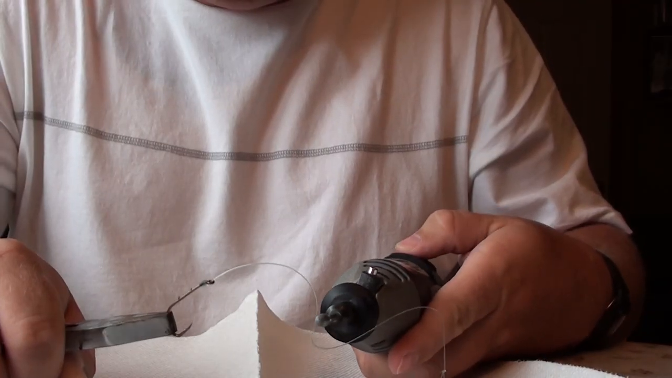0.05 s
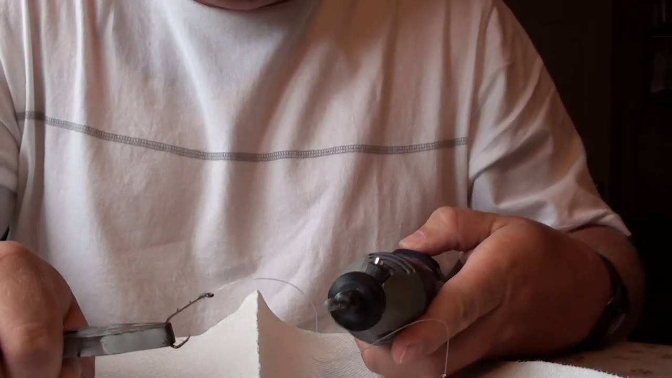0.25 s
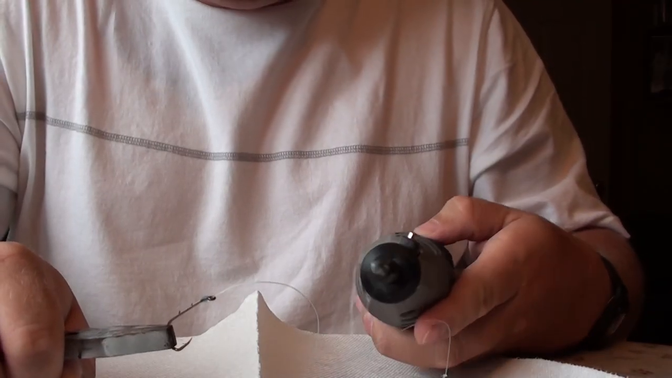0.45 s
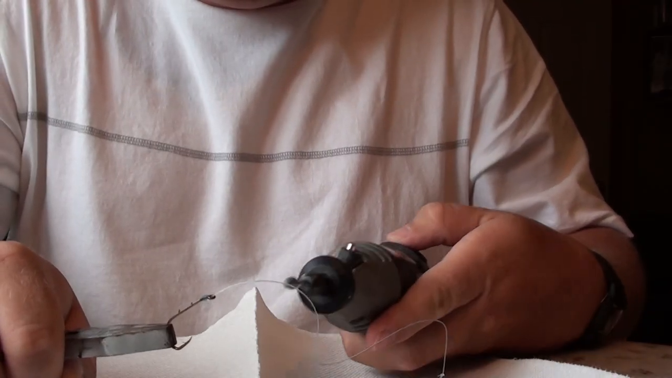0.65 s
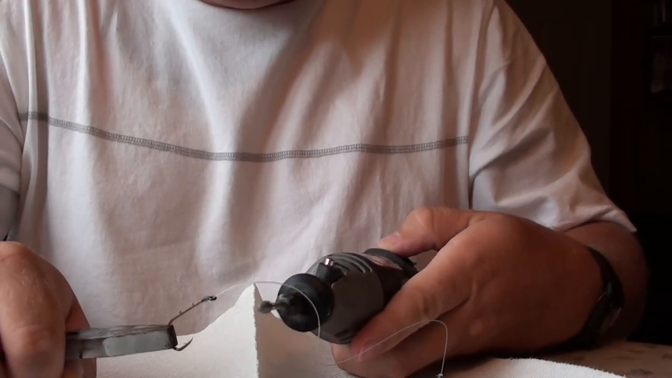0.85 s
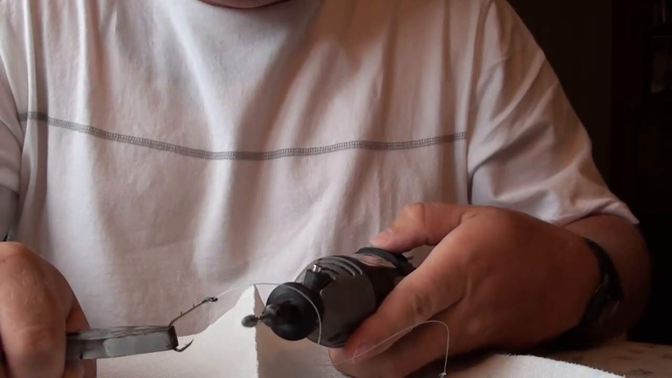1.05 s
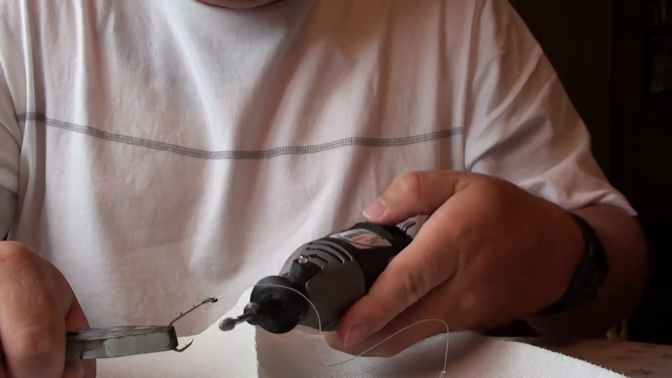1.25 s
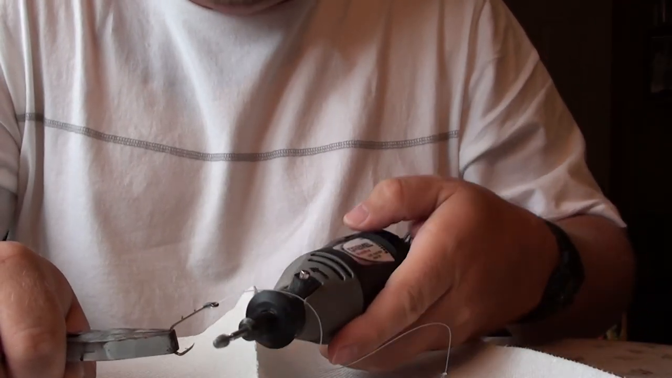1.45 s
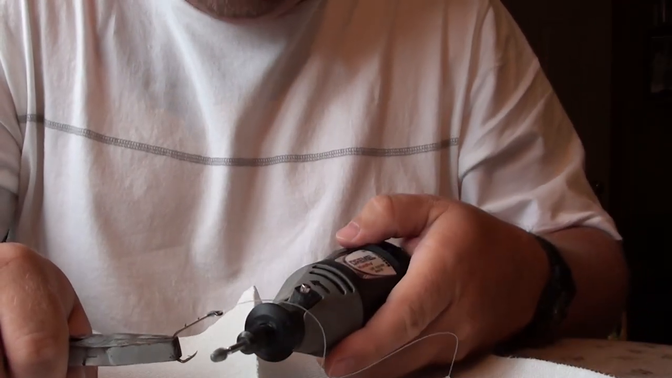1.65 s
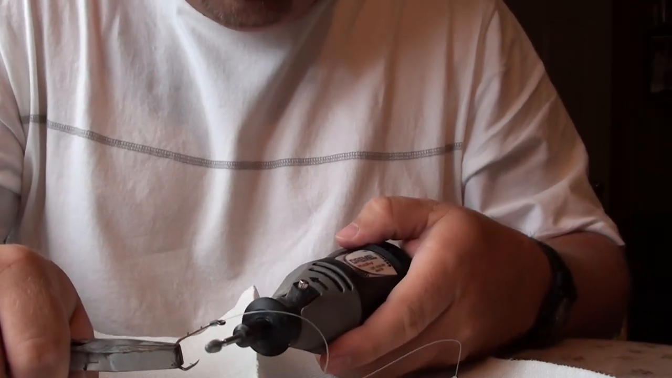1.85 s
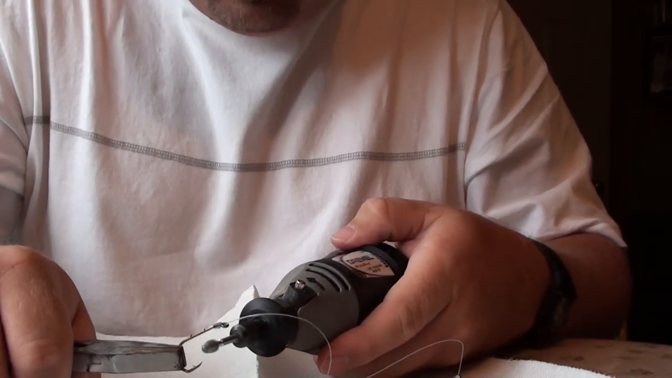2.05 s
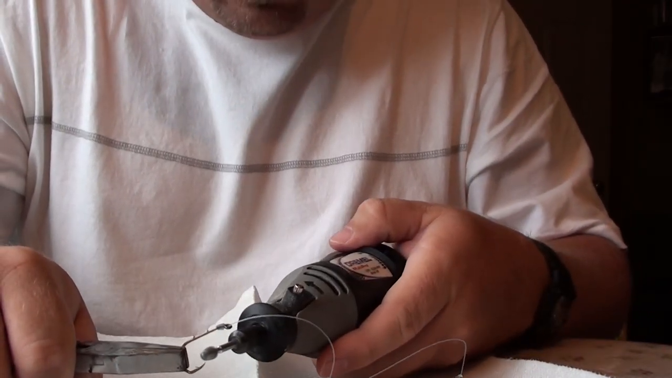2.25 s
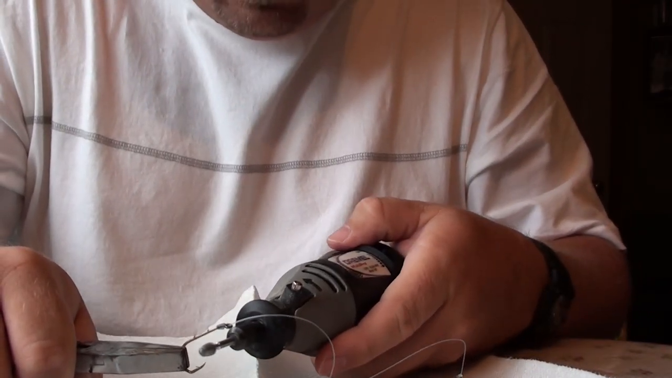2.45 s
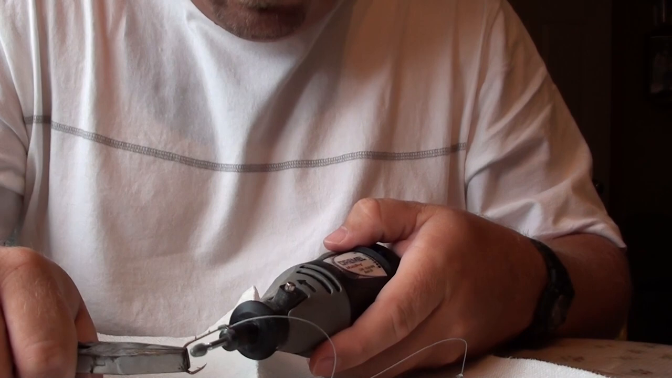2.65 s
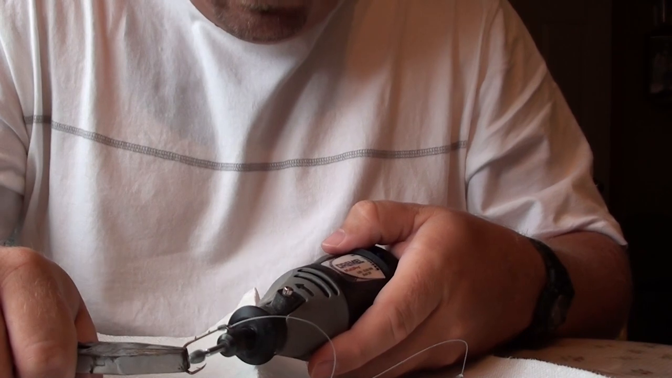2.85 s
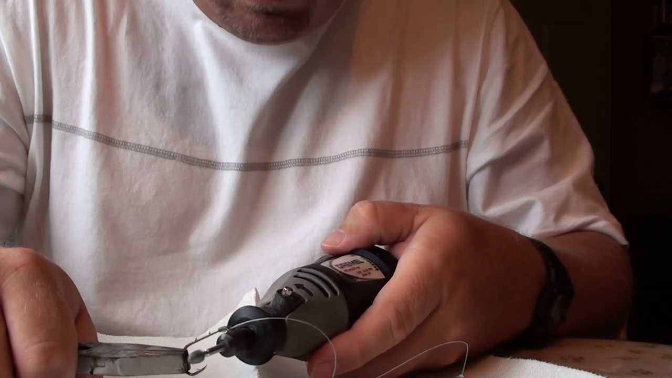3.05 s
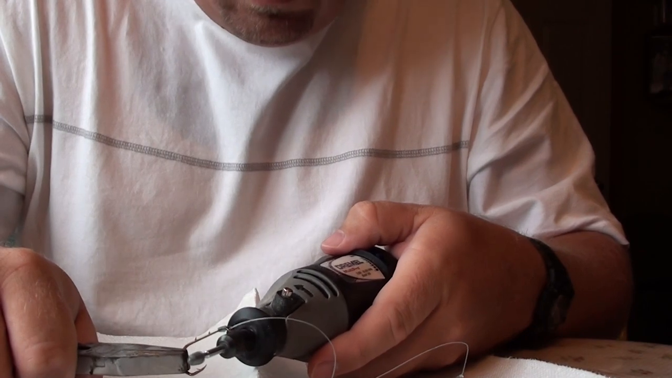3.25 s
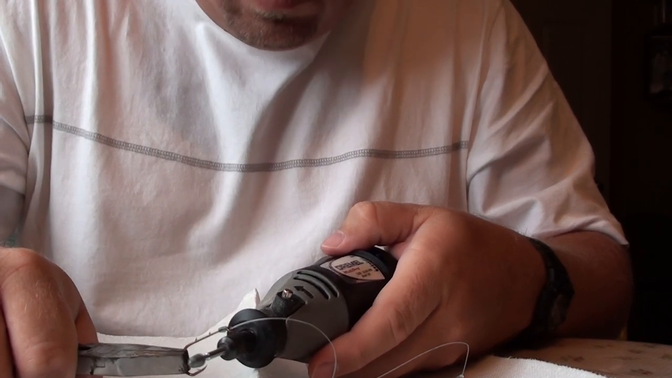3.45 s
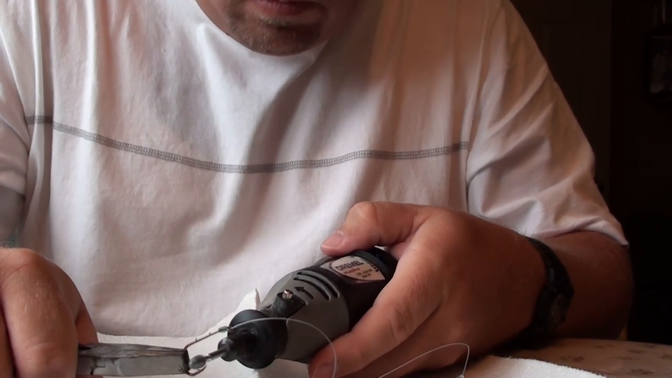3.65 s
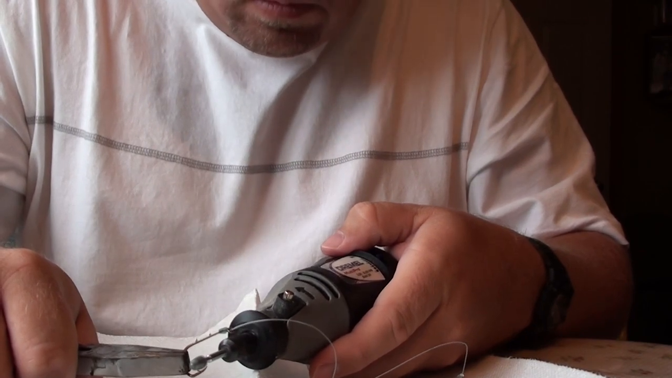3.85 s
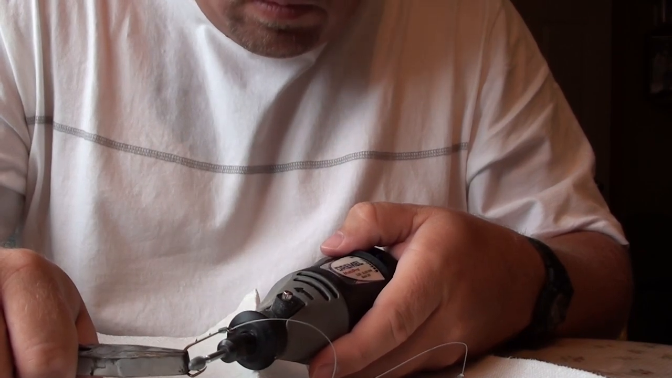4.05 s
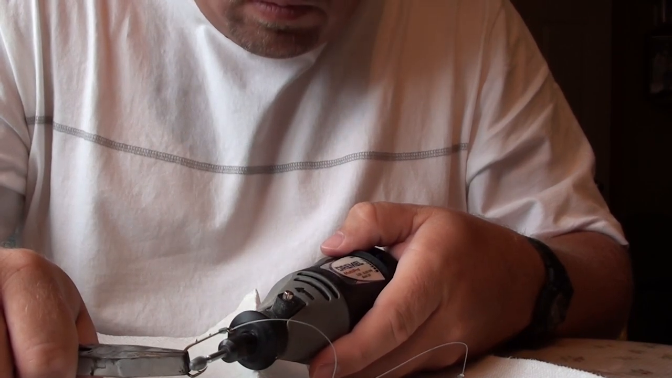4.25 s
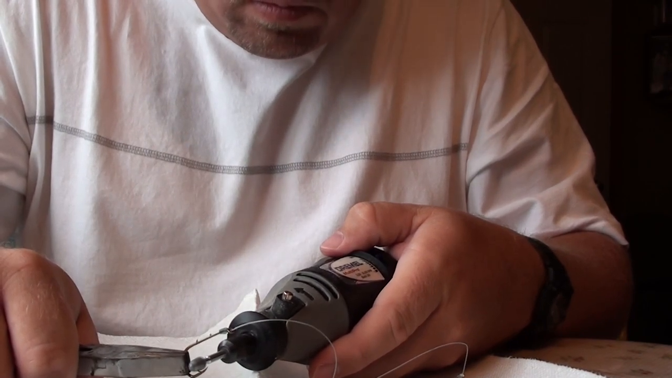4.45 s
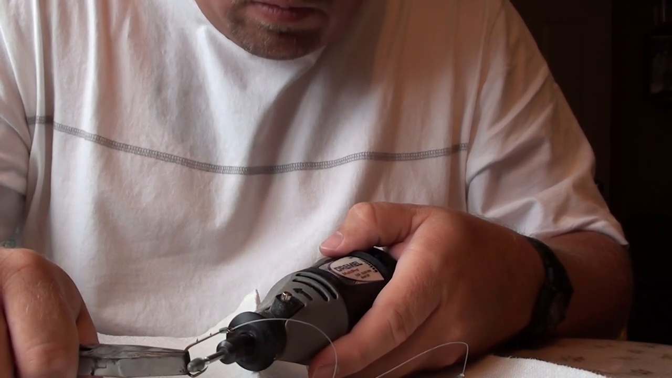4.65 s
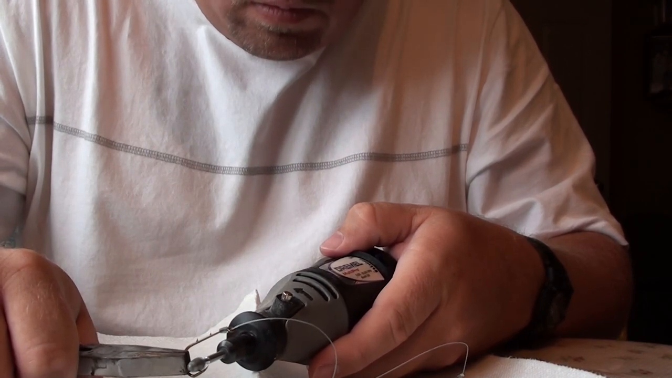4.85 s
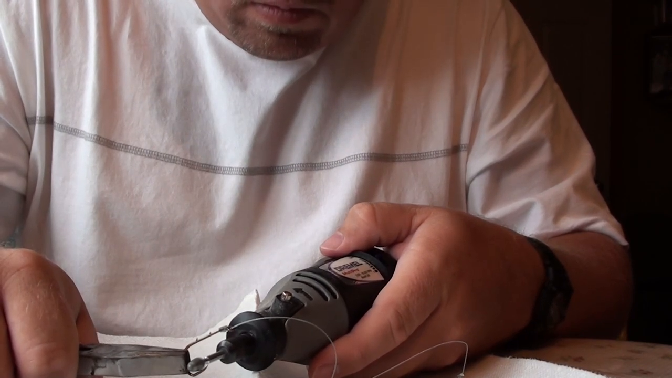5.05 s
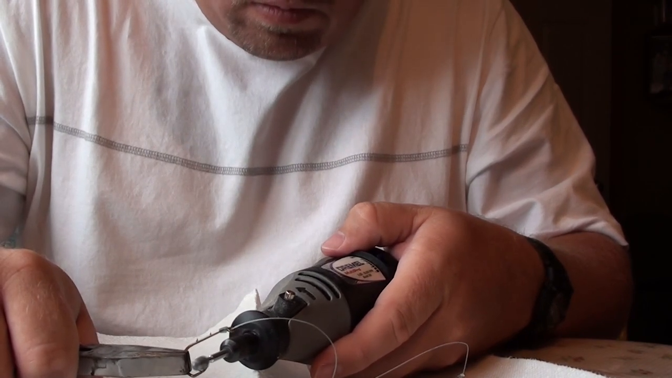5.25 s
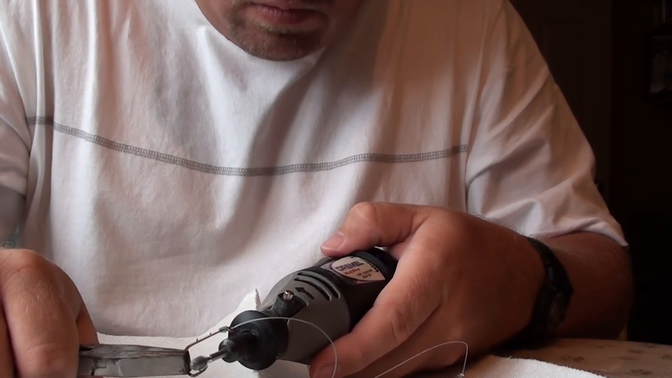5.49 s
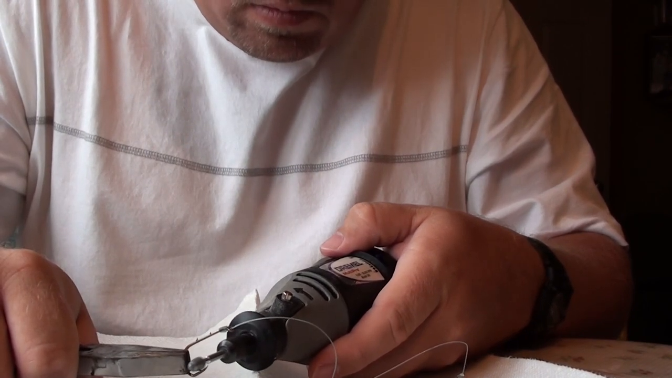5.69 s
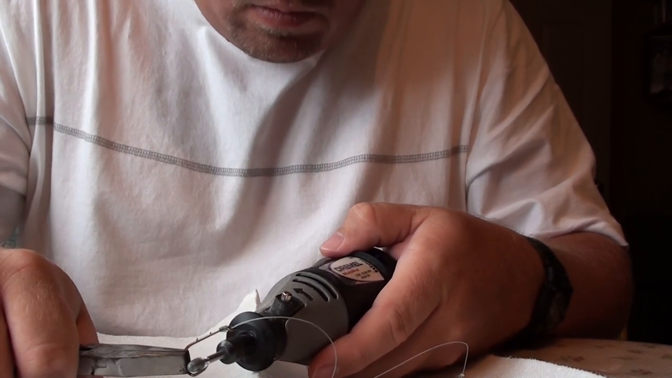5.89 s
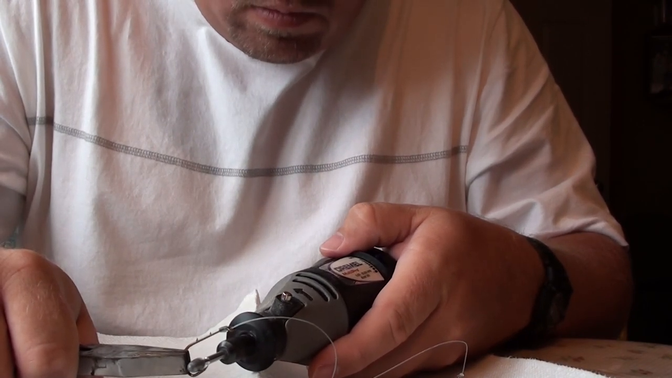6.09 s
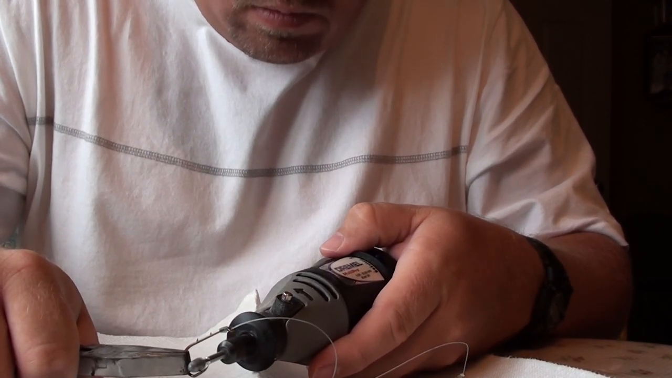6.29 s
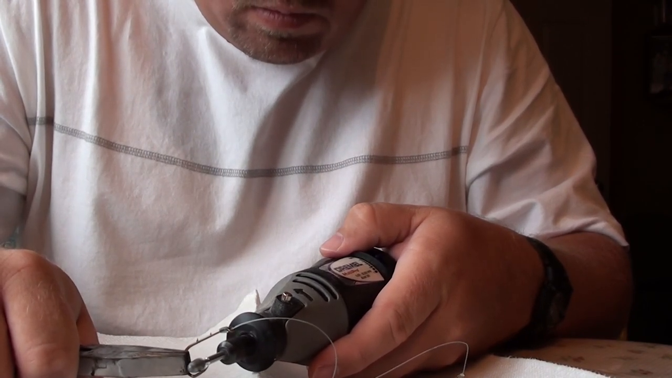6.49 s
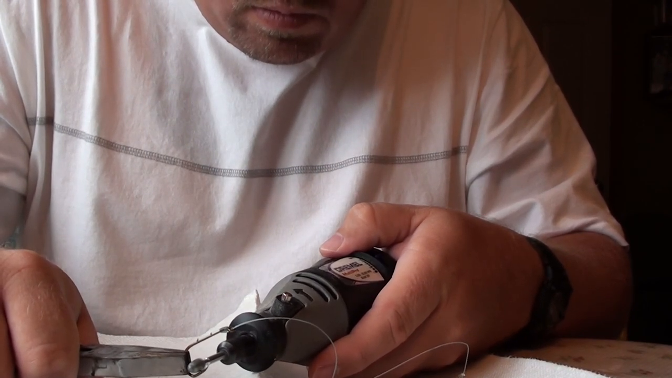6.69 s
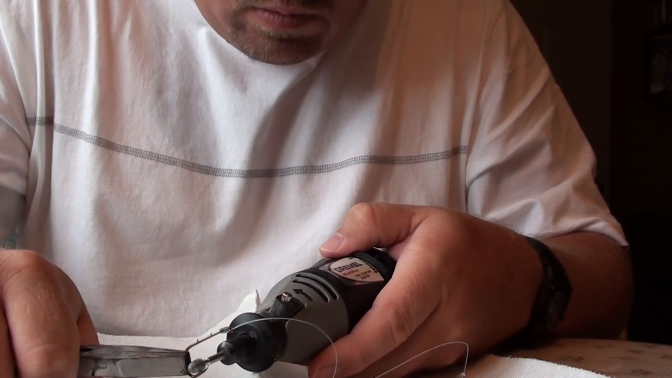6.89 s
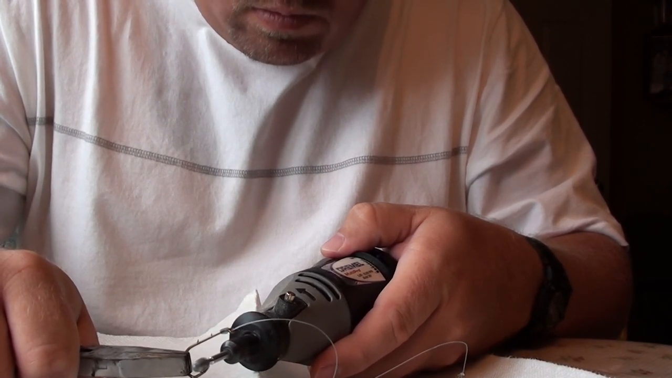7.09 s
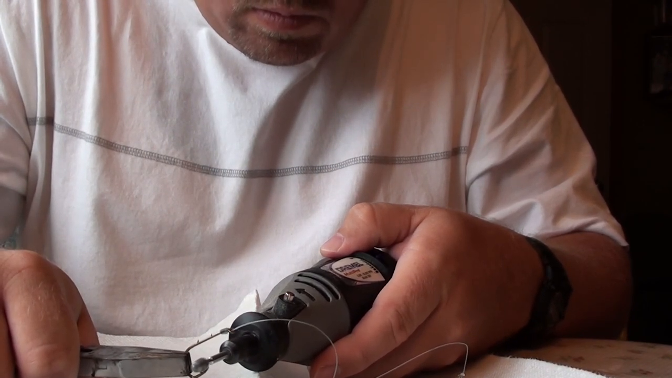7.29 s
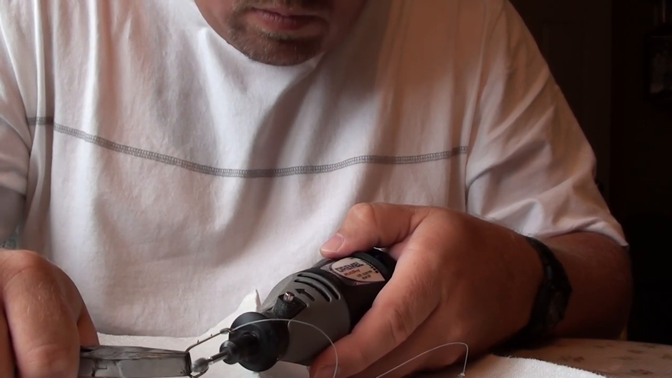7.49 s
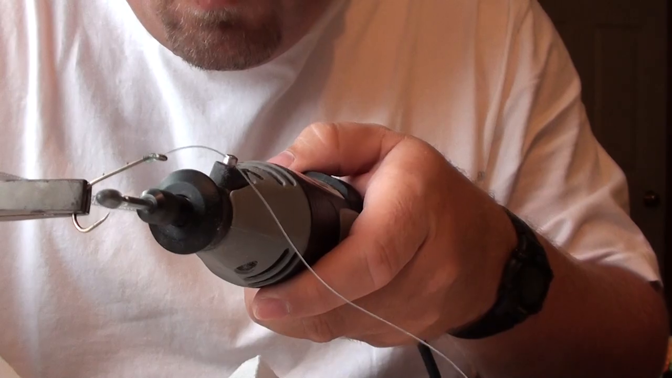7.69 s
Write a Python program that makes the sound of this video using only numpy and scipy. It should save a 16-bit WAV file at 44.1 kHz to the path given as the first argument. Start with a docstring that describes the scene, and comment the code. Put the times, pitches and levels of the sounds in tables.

```python
"""A small room, close to a mains-driven hand-held rotary tool that runs up in two steps of its speed dial.
Magnetic force, pulsing twice per mains cycle, modulates the whine of the armature slots, over shaft
harmonics and turbulent cooling air. Then the tool's stone grinds a steel hook held in pliers: one impact
a turn drives the hook's resonant modes, and the microphone's gain control ducks the motor under them."""
import sys
import numpy as np
from scipy import signal
from scipy.fft import rfft, irfft, next_fast_len
from scipy.io import wavfile
from scipy.ndimage import uniform_filter1d, map_coordinates

SR = 44100
rng = np.random.default_rng(int(sys.argv[2]) if len(sys.argv) > 2 else 0)


def dump_mix(stems):
    """Bounce the given channels to the path in sys.argv[1] as a 16-bit WAV at rate SR."""
    frames = np.atleast_2d(stems).T  # one column per channel
    limited = np.clip(frames, -1, 1)  # hard clip at full scale
    pcm = np.round(limited * 32767).astype(np.int16)
    wavfile.write(sys.argv[1], SR, pcm)


N = 340893
TIME = np.arange(N) / SR


def amp(db):
    """Decibels to amplitude ratio."""
    return 10 ** (np.asarray(db) / 20)


def unit(x):
    """Normalisation to rms 1."""
    return x / np.sqrt(np.mean(x ** 2) + 1e-20)


def along(points, hz):
    """Interpolation of (frequency [Hz], value) points on a logarithmic frequency axis."""
    f, v = np.transpose(points)
    return np.interp(np.log(hz + 1), np.log(f + 1), v)


def wobble(rate):
    """Slow random modulation: a spline through `rate` Gaussian knots a second."""
    coarse = TIME[::32]
    knots = rng.standard_normal(int(N * rate / SR) + 4)
    return np.interp(TIME, coarse, map_coordinates(knots, [coarse * rate]))


def filtered(x, response):
    """Linear filtering: the spectrum of x times a complex frequency response."""
    m = next_fast_len(N + SR // 2)
    return irfft(rfft(x, m) * response(np.fft.rfftfreq(m, 1 / SR)), m)[..., :N]


def modes(table):
    """Modal superposition: the response of damped resonators, summed with alternating sign."""
    return lambda f: sum((-1) ** k * amp(db) * 1j * f * width / (hz * hz - f * f + 1j * f * width)
                         for k, (hz, width, db) in enumerate(table))


def noise(spectrum):
    """Spectral shaping: white noise coloured to a spectrum, at rms 1."""
    return unit(filtered(rng.standard_normal(N), lambda hz: amp(along(spectrum, hz))))


def tones(table, turns, waver_db):
    """Harmonic series: sines on multiples of the shaft rate, wavering in level by waver_db."""
    return sum(amp(db + waver_db * wobble(9)) * np.sin(2 * np.pi * (k * turns + rng.random()))
               for k, db in table)


def impulses(places, sizes):
    """Band-limited interpolation: windowed sinc pulses that fall between samples."""
    taps = np.floor(places)[:, None].astype(int) + np.arange(-7, 9)
    offset = taps - places[:, None]
    shape = np.sinc(offset) * np.cos(offset * np.pi / 16) ** 2
    return np.bincount(np.clip(taps, 0, N + 15).ravel(), (shape * sizes[:, None]).ravel(), N + 16)[:N]


# Background noise of the room: (frequency [Hz], relative spectral level [dB])
ROOM_TONE_SPECTRUM = [(15, -20), (30, -20), (60, -17), (170, 7), (350, 6.5), (1000, -12)]

def room_tone():
    """Stationary broadband noise, strongest in the low hundreds of hertz."""
    return amp(-50) * noise(ROOM_TONE_SPECTRUM)


# Decay of the room: (frequency [Hz], reverberation time T60 [s])
ROOM_DECAY = [(200, 0.42), (2000, 0.077), (12000, 0.054)]
# Faint stereo width, spectrum of the left-right difference: (frequency [Hz], relative level [dB])
WIDTH_SPECTRUM = [(60, -8), (200, -18), (400, 3), (1300, -15), (2400, -5), (4400, -22), (8000, 3.5),
                  (11000, -56), (15000, -21)]

def reverberation(x):
    """A diffuse field decays exponentially in each band; a faint left-right difference adds width."""
    hz, t, spectra = signal.stft(rng.standard_normal((2, SR // 2)), SR, nperseg=256)
    tails = signal.istft(spectra * amp(-60 * t / along(ROOM_DECAY, hz)[:, None]), SR, nperseg=256)[1]
    delayed = np.pad(x, (150, 0))[None]
    mid, side = signal.fftconvolve(delayed, tails / np.linalg.norm(tails[0]), axes=1)[:, :N]
    side = amp(-25) * filtered(side, lambda hz: amp(along(WIDTH_SPECTRUM, hz)))
    return amp(-16) * mid + np.array([side, -side])


# Low tones of fixed pitch: (frequency [Hz], level [dB])
HUM_TONES = [(119, -62), (156, -66), (188, -59), (360, -74), (480, -53)]

def hum():
    """Superposition of faint pure tones, each slowly modulated in amplitude."""
    return sum(amp(db + 1.8 * wobble(3.2)) * np.sin(2 * np.pi * hz * TIME) for hz, db in HUM_TONES)


# Detent clicks of the speed dial: (time [s], excitation level [dB])
DIAL_CLICKS = [(0.9228, -11), (0.933, -8)]

def dial_clicks():
    """Impact excitation: each plastic detent rings two heavily damped modes of the casing."""
    bursts, t = np.zeros(N), np.arange(SR // 50) / SR
    attack = 1 - np.exp(-t / 0.00063)
    for s, db in DIAL_CLICKS:
        envelope = amp(db - 2.5 - 60 * t / 0.02) * attack
        bursts[round(s * SR):][:len(t)] += envelope * rng.standard_normal(len(t))
    return filtered(bursts, modes([(3800, 2700, 8.0), (7040, 4500, 1)]))


# Target speed of the high setting, wandering with the load: (time [s], shaft rate [Hz])
HIGH_SPEED = [(0.93, 286.4), (3.94, 290.6), (4.56, 290.5), (5.1, 289.6), (5.3, 290.7), (5.42, 289.5),
              (5.6, 289.5), (5.82, 290.6), (6.0, 290.0), (6.29, 290.2), (7.12, 288.6), (7.68, 289.3)]
START_HZ, LOW_HZ, LOW_RISE_S, HIGH_RISE_S = 103.3, 185.3, 0.565, 0.3655

def shaft_rate():
    """First-order step response: the shaft rate [Hz] nears each dial setting exponentially."""
    low = LOW_HZ - (LOW_HZ - START_HZ) * np.exp(-TIME / LOW_RISE_S)
    click_s = DIAL_CLICKS[-1][0]
    target = np.interp(TIME, *np.transpose(HIGH_SPEED))
    step_hz = HIGH_SPEED[0][1] - np.interp(click_s, TIME, low)
    high = target - step_hz * np.exp(-(TIME - click_s) / HIGH_RISE_S)
    return np.where(TIME < click_s, low, high)


def speed_law_db(speed, per_doubling_db, low_cut_db):
    """Power law: level against speed (1 = full), with a further cut on the dial's low setting."""
    on_low = np.interp(TIME, [DIAL_CLICKS[0][0], DIAL_CLICKS[-1][0]], [1, 0])
    return per_doubling_db * np.log2(speed) - low_cut_db * on_low


MAINS_HZ = 60.006

def magnetic_force():
    """Phase control fires once per mains half-cycle: the force rises fast and falls more slowly."""
    firing, rise, fall = 0.911, 0.066, 0.28  # fractions of a half-cycle
    cycle = (2 * MAINS_HZ * TIME - firing) % 1
    return unit((1 - np.exp(-(cycle / rise) ** 2)) * np.exp(-(cycle / fall) ** 2))


# Roar of the cooling air: (frequency [Hz], relative spectral level [dB])
ROAR_SPECTRUM = [(20, -60), (60, -54), (130, -45), (400, -9), (650, -6.5), (870, 1), (1150, 0.5),
                 (1330, -12.5), (1600, -1.5), (1900, -4.5), (2300, 3.5), (3000, -10.5), (5000, -21.5)]
# Hiss of the cooling air: (frequency [Hz], relative spectral level [dB])
HISS_SPECTRUM = [(1500, -20.5), (3000, -6.5), (4200, -1.5), (5500, -3.5), (7500, 4), (9500, -1),
                 (11500, -8), (14000, -13), (15800, -29.5)]

def cooling_air(speed, flow, pulses):
    """Turbulence noise grows with speed; the hiss pulses as the brushes spark while current flows."""
    roar = amp(-27.5) * flow * noise(ROAR_SPECTRUM)
    hiss_db = -21.5 + speed_law_db(speed, per_doubling_db=6.7, low_cut_db=1.8) + 0.23 * wobble(30)
    sparks = unit(1 + 0.057 * pulses)
    return roar + amp(hiss_db) * sparks * noise(HISS_SPECTRUM)


# Fan tones that leave with the cooling air: (shaft order [1], relative level [dB])
FAN_ORDERS = [(3, -42), (13, -32.5), (18, -30), (35, -38.5)]
BEARING_ORDER, BEARING_WAVER_HZ = 25.86, 58

def rotor_tones(speed, turns):
    """Rotational orders: fan harmonics, a frequency-modulated bearing tone and unbalance."""
    bearing_level = speed ** 2.5 * amp(-28.5 + 3 * wobble(90))
    drift = BEARING_WAVER_HZ * np.cumsum(wobble(120)) / SR
    bearing = bearing_level * np.sin(2 * np.pi * (BEARING_ORDER * turns + drift))
    # unbalance grows steeply with speed and beats with the magnetic force
    sideband = 0.72 * np.sin(2 * np.pi * (turns + 2 * MAINS_HZ * TIME))
    unbalance = speed ** 4 * amp(-48.5 + 2.1 * wobble(3.95)) * (np.sin(2 * np.pi * turns) + sideband)
    fan = speed ** 2.1 * tones(FAN_ORDERS, turns, waver_db=0)
    return fan + bearing + unbalance


# Slot harmonics: (shaft order [1], relative level at full speed [dB], change per speed doubling [dB])
SLOT_ORDERS = [(8, .5, -1), (16, -8, -4.5), (24, -9, -2), (32, -22, -1), (40, -21.5, -13.5)]

def slot_whine(speed, turns, pulses):
    """Amplitude modulation: the magnetic force chops the armature's slot-passing tones into bursts."""
    whine = np.zeros(N)
    for order, db, per_doubling_db in SLOT_ORDERS:
        level = amp(db + per_doubling_db * np.log2(speed) + 0.77 * wobble(25))
        whine += level * np.sin(2 * np.pi * round(order) * turns + 0.029 * wobble(44))
    return amp(-12 + speed_law_db(speed, per_doubling_db=7.7, low_cut_db=5.5)) * pulses * whine


# Resonances of the casing: (frequency [Hz], bandwidth [Hz], gain [dB])
CASING_MODES = [(1090, 67, -12), (2464, 400, 0.5), (3530, 460, -2), (4386, 320, -5), (5980, 400, 0),
                (7710, 480, -1.5)]
# Harmonics of the once-a-turn rattle: (shaft order [1], relative level [dB])
RATTLE_ORDERS = [(12, -41.5), (14, -34), (15, -43), (17, -31.5), (22, -33), (23, -36), (25, -40),
                 (26, -32.5), (27, -42), (28, -43), (29, -32), (30, -53), (31, -28.5), (39, -29), (41, -43)]
WHINE_DROP_S = 7.694  # the whine drops away just before the end

def motor(speed, turns):
    """Forced vibration: whine and rattle pass through the casing's modes; the rest radiates directly."""
    flow = amp(speed_law_db(speed, per_doubling_db=9.4, low_cut_db=0.87))
    whine_drop = np.where(TIME < WHINE_DROP_S, 1, 0.3)
    pulses = whine_drop * magnetic_force()
    whine = slot_whine(speed, turns, pulses)
    rattle = amp(5) * flow * tones(RATTLE_ORDERS, turns, waver_db=3)
    casing = filtered(whine + rattle, modes(CASING_MODES))
    rotor = amp(3.5) * flow * rotor_tones(speed, turns)
    return casing + rotor + hum() + cooling_air(speed, flow, pulses)


# Modes of the steel hook in five groups, low to high: (frequency [Hz], bandwidth [Hz], gain [dB])
HOOK_MODES = [
    [(1770, 200, -17), (3500, 225, 0), (3798, 155, 5), (4200, 160, 2.5), (4680, 270, -2.5)],
    [(6470, 680, -12.5), (7270, 270, 3.5), (7900, 320, -0.5), (8240, 160, -7)],
    [(9050, 1290, 4), (9690, 750, 3.5)],
    [(10930, 550, 1.5), (12580, 770, 1)],
    [(14220, 720, 2.5), (15070, 550, 0)],
]
# First light touches of the stone: (time [s], level [dB], offset for the high modes [dB])
FIRST_TOUCHES = [(2.9871, -2, -14), (3.0043, -2, -12), (3.0818, 0, -25), (3.0864, 0, -15), (3.097, 0, -17),
                 (3.1034, -4, -13), (3.1124, -1, -17), (3.119, -1, -21), (3.1254, -4, -14),
                 (3.135, -2, -19), (3.1467, -3.5, -13), (3.1554, -6, -16), (3.163, -1, -14),
                 (3.169, -2, -15), (3.1768, -3, -15), (3.186, -6, -13), (3.194, -2, -8), (3.2044, -5, -9),
                 (3.2134, -6, -13), (3.222, -5, -17), (3.24, -4, -21), (3.247, -4.5, -24),
                 (3.2645, -8, -19), (3.288, -2, -23), (3.305, -3, -24), (3.3114, -0.5, -27),
                 (3.3184, -6, -11), (3.3303, -5, -20), (3.3354, -6, -21), (3.3454, -7, -11),
                 (3.444, -4.5, -17)]
TOUCH_LOW_DB, RING_DB = -7.5, 14  # offset for the low modes; excess of a scratch over the ring it leaves

def touches():
    """Transient excitation: scratches of a few milliseconds leave the hook's modes ringing freely."""
    drives, t = np.zeros((3, N)), np.arange(SR // 70) / SR
    attack = 1 - np.exp(-(t / 0.0011) ** 2)
    for s, db, high_db in FIRST_TOUCHES:
        scratch = amp(db + RING_DB - 60 * t / 0.013) * attack * rng.standard_normal(len(t))
        drives[:, round(s * SR):][:, :len(t)] += amp([[TOUCH_LOW_DB], [0], [high_db]]) * scratch
    bands = HOOK_MODES[0], HOOK_MODES[1], HOOK_MODES[2] + HOOK_MODES[3] + HOOK_MODES[4]
    return filtered(drives, lambda hz: np.array([modes(band)(hz) for band in bands])).sum(0)


# Successive holds of the stone on the hook:
# (start time [s], pressure level [dB], place [mm], bounce [0-1], shake of the pliers [dB])
HAND_HOLDS = [(3.745, -1, .8, .65, -64), (3.93, 1.5, .1, 1, -64), (4.04, 0.7, 0.18, .95, -51),
              (4.26, 1.2, 0.093, 0.47, -67), (4.36, 3, 0.24, .6, -68), (4.46, 0, 0.33, .7, -57),
              (4.57, -2.1, 9.4, 0.6, -52), (4.695, 0.5, 7.5, 0.1, -62), (4.87, 0, 9.5, 0.57, -60),
              (5.08, 0, 8.5, 1, -59), (5.33, -1.5, 11, .95, -46), (5.43, 1.2, 0.22, 0.6, -56),
              (5.57, 2.5, 2.2, 0.9, -60), (5.73, 1.5, 3.9, 0.4, -62), (5.84, 0.5, 9.9, .9, -56),
              (5.97, -0.8, 6, 0.55, -63), (6.26, -1, 12.6, 0.8, -49), (6.41, -2, 6.5, 0.8, -57),
              (6.52, 1, 11.5, 0.6, -53), (6.68, -4.5, 22, 0.3, -49), (6.76, -4, 7, .95, -49),
              (6.9, -3.5, 7.2, 1, -51), (7.06, -2.5, 12, .87, -43), (7.125, -10, 11.5, .8, -43),
              (7.165, -2.3, 10.6, 0.8, -43), (7.4, -3.2, 11, 0.6, -47), (7.694, -2.5, 3.6, 0.3, -59)]
MOVE_S = 0.0093

def hand():
    """Moving-average smoothing: pressure, place, bounce and shake glide briefly from hold to hold."""
    starts, *columns = np.transpose(HAND_HOLDS)
    row = np.clip(np.searchsorted(starts, TIME) - 1, 0, None)
    return [uniform_filter1d(column[row], int(MOVE_S * SR)) for column in columns]


# Response along the hook: (place [mm], level of each of the five mode groups [dB], roughness [0-1])
HOOK_SPOTS = [(0, -25, -19, -15, -25, -28.5, 0.48), (3, -22.5, -11.5, -20, -26.5, -34, 0.22),
              (6, -16, -14.5, -19.5, -20.5, -21.5, .4), (9, -20.5, -14, -20, -17.5, -28, 0.46),
              (12, -19, -25, -28, -26, -19.5, 0.68)]
TREMBLE_DB = 1.5  # unsteadiness of the hand

def grinding(turns):
    """Periodic impact and friction: the stone's high spot strikes and scrapes the hook once a turn."""
    press_db, place, bounce, shake_db = hand()
    spot_mm, *columns = np.transpose(HOOK_SPOTS)
    *group_db, roughness = (np.interp(place, spot_mm, column) for column in columns)
    turn = np.floor(turns).astype(int)
    angle = turns - turn
    onsets = np.interp(np.arange(turn[-1] + 1), turns, np.arange(N))  # first sample of each turn
    shared_db = 3.13 * rng.standard_normal(len(onsets))
    scrape = np.exp(-((angle - 0.3) / 0.24) ** 2)  # pressure swells and fades as the high spot passes
    ringing = np.zeros(N)
    for db, group in zip(group_db, HOOK_MODES):
        top_hz = group[-1][0]
        rough = np.clip(roughness * (top_hz / 9000) ** 0.12, 0, 1)  # low modes average over more grains
        # a bouncing hook misses much of every second strike; a light one still stirs the low modes
        lost = np.clip(bounce * (top_hz / 11000) ** 0.53, 0, 0.93)
        alternation = np.where(turn % 2, 1 - lost, 1 + lost) / np.sqrt(1 + lost ** 2)
        scatter_db = shared_db + 1.8 * rng.standard_normal(len(onsets))
        size = amp(rough * scatter_db[turn]) * alternation
        strike_at = onsets + 45 + 0.3 * rng.standard_normal(len(onsets))
        strikes = unit(impulses(strike_at, size[onsets.astype(int)]))
        # the same grains come round every turn, until the hand drifts to another track of the stone
        grains = map_coordinates(rng.standard_normal((80, 130)), [TIME * 7.5, angle * 128], order=1)
        repeating = unit(0.54 * strikes + unit(size * scrape * grains))
        loose = unit(size * scrape * rng.standard_normal(N))
        drive = np.sqrt(1 - rough) * repeating + np.sqrt(rough) * loose
        ringing += amp(press_db + db + TREMBLE_DB * wobble(14)) * unit(filtered(drive, modes(group)))
    shake = amp(shake_db) * np.sin(np.pi * turns)  # subharmonic at half the shaft rate
    contact_s = HAND_HOLDS[0][0]
    return (ringing + shake) * np.interp(TIME, [contact_s - MOVE_S, contact_s], [0, 1])


def scene():
    """Superposition of direct and reverberant sound; one shaft angle times both motor and grinding."""
    rate_hz = shaft_rate()
    turns = np.cumsum(rate_hz) / SR
    direct = motor(rate_hz / rate_hz.max(), turns) + touches() + grinding(turns) + dial_clicks()
    direct += room_tone()
    return direct + reverberation(direct)


THRESHOLD_DB, GAIN_SHARE, ATTACK_S, RECOVER_DB_PER_S = -5, 0.8, 0.001, 81
CLIP_AT, KNEE, BASS_CUT_HZ, TOP_HZ = 0.82, 7, 55, 15850

def record(dry):
    """Dynamic compression ducks everything when the stone bites; soft clipping and band limits follow."""
    recovery_db = RECOVER_DB_PER_S * TIME
    level_db = 20 * np.log10(np.abs(dry).max(0) + 1e-6)
    peaks_db = np.maximum.accumulate(level_db + recovery_db) - recovery_db
    excess_db = np.logaddexp(0, peaks_db - THRESHOLD_DB)
    pole = np.exp(-1 / (ATTACK_S * SR))
    ducked = dry * amp(signal.lfilter([1 - pole], [1, -pole], -GAIN_SHARE * excess_db))
    rounded = ducked / (1 + np.abs(ducked / CLIP_AT) ** KNEE) ** (1 / KNEE)
    return filtered(rounded, lambda hz: (hz < TOP_HZ) * (hz / (hz - 1j * BASS_CUT_HZ)) ** 2)


dry = scene()
out = record(dry)
dump_mix(out)
```